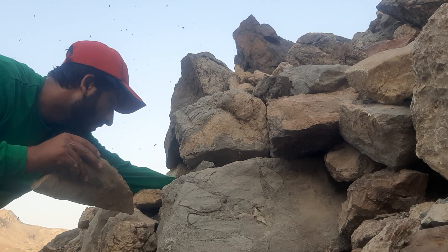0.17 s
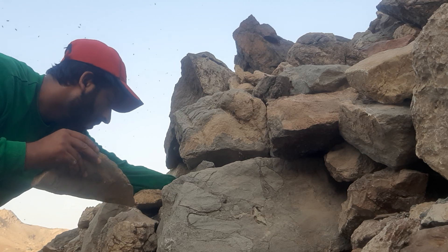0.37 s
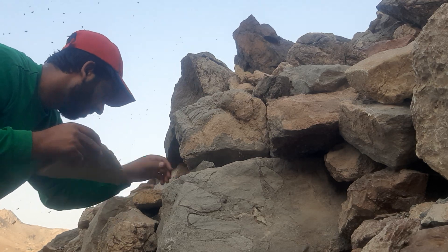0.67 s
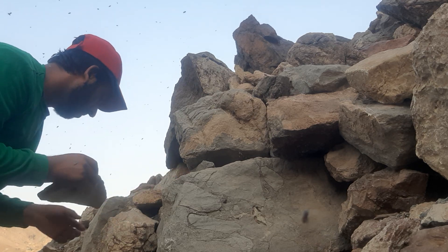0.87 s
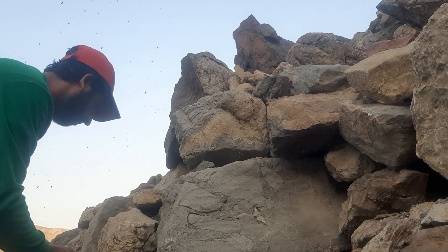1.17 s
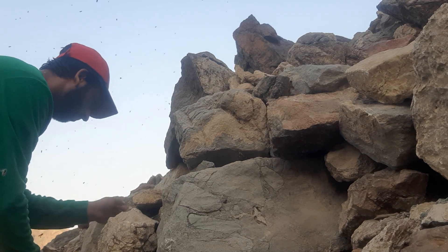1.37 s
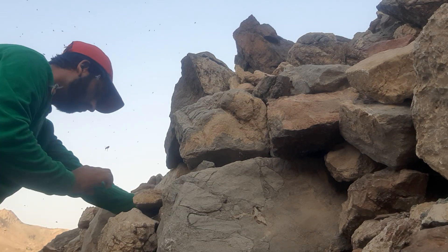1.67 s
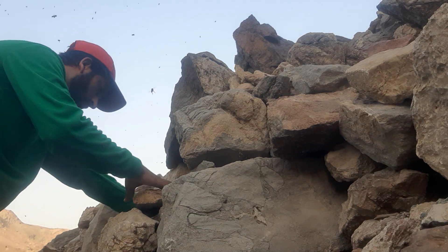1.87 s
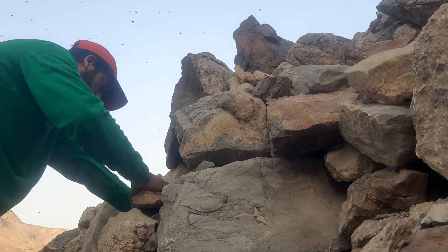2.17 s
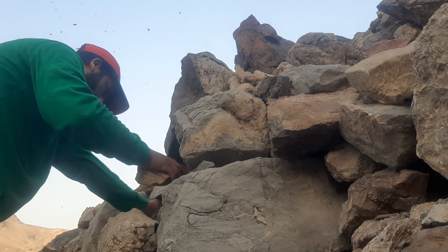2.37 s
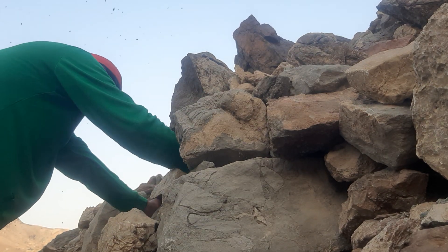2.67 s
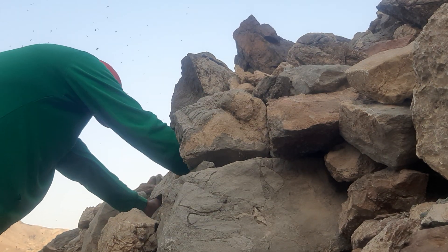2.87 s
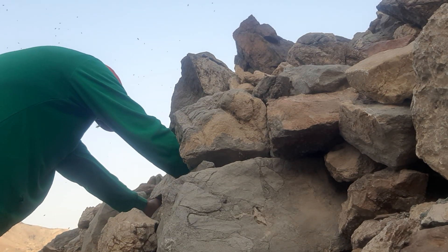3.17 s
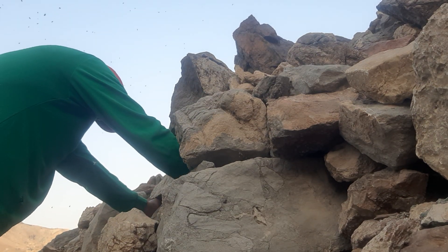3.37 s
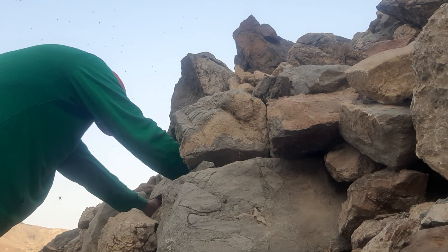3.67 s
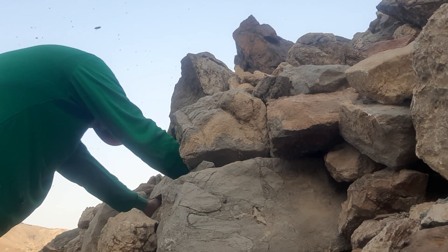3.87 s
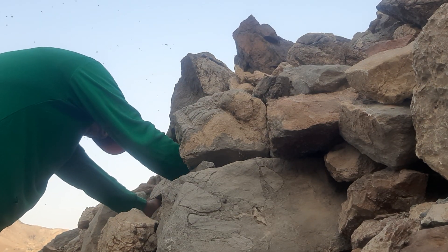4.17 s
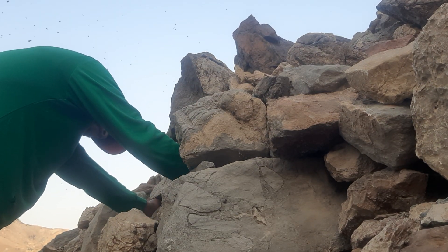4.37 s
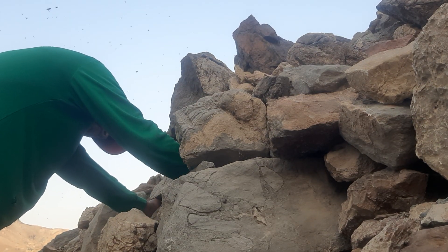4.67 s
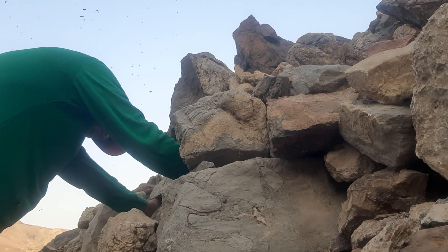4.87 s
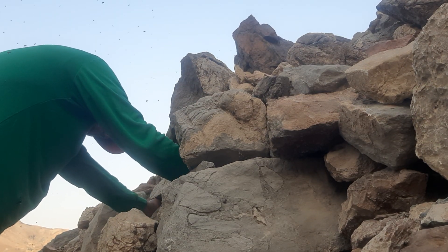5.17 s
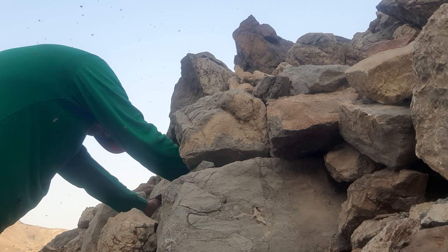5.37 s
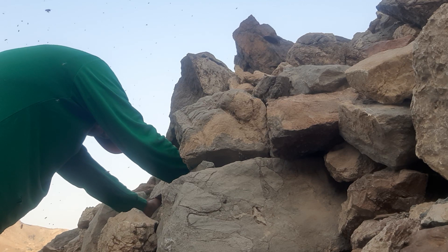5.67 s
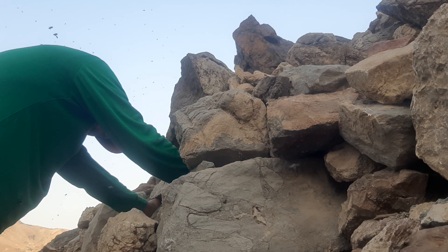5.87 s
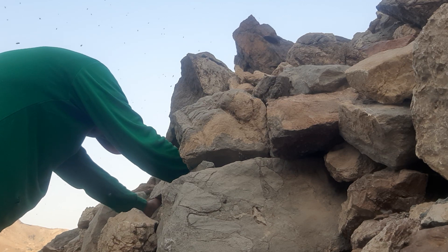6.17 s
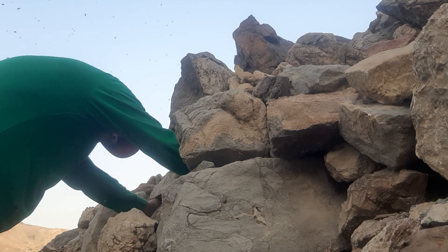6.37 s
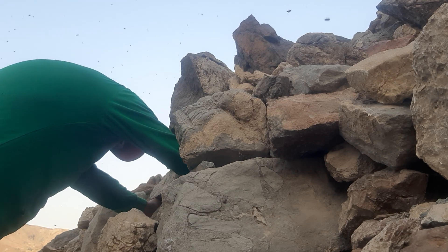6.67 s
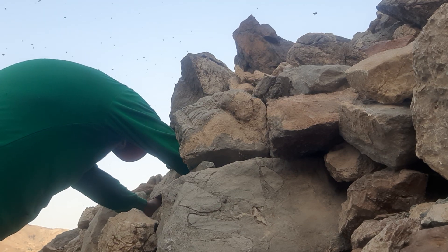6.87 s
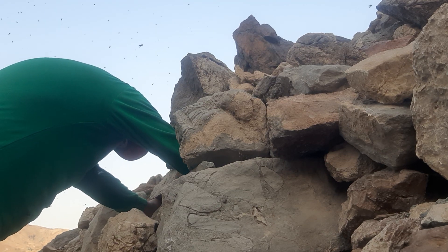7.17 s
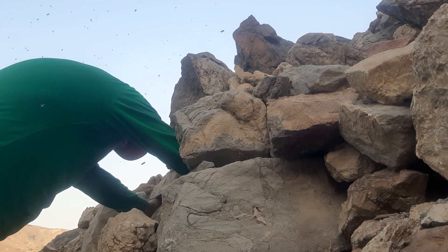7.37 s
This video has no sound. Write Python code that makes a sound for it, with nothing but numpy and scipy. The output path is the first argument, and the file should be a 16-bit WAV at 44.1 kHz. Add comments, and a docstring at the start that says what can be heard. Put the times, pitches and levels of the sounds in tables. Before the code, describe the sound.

Over faint bees and distant birds, a stone slab lands with two ringing clinks before hands shift rocks with dull knocks and bumps.

```python
"""A faint hum of bee wingbeats in open air comes first and runs throughout; birds call far away.
A flat stone is put down on a rock pile: its bending and twisting modes clink twice, bright and ringing,
as it rocks on sandy rock and settles. Dust slides off. Then hands shift stones deep in a gap:
dull knocks, booming hollows, bumps on soil, stick-slip rubbing and a little crushed grit."""
import sys
import numpy as np
from scipy import signal
from scipy.fft import rfft, irfft, next_fast_len
from scipy.io import wavfile
from scipy.ndimage import uniform_filter1d

SR = 44100
rng = np.random.default_rng(int(sys.argv[2]) if len(sys.argv) > 2 else 0)


def to_wav(s):
    """Save 16-bit WAV."""
    ch = np.atleast_2d(s).T  # columns
    pcm = np.round(np.clip(ch, -1, 1) * 32767)  # PCM
    wavfile.write(sys.argv[1], SR, pcm.astype(np.int16))


N = 332073
T = np.arange(N) / SR

# Table levels are relative; the functions add their own gains.
# swarm nearness: t/s, level/dB
SWARM_LEVELS = [(0, -71), (.7, -69), (1.2, -67), (2.2, -72.5), (3, -64.5), (5.6, -70.5), (7.53, -65)]
# wingbeat harmonics, from the first: level/dB
WING_HARMONICS_DB = [-3, 3.5, -13.5, -17, -12.5, -18.5]
# bird pip onsets: t/s
PIP_TIMES_S = [2.348, 2.634, 2.865, 3.084]
# falling bird whistles: t/s, start f/Hz, level/dB
BIRD_WHISTLES = [(1.37, 3970, -70.5), (2.98, 4070, -81), (4.72, 4000, -79), (5.33, 4740, -73),
                 (6.63, 3970, -76.5)]

# noise spectra: f/Hz, density level/dB
AIR_SPECTRUM = [(20, -17.5), (65, 1), (120, -2.5), (250, -9.5), (480, 0.5), (750, -5.5), (1000, -1.5),
                (1350, -10.5), (1550, -6.5), (1750, -21), (2050, -14.5), (2500, -23.5), (4500, -34.5)]
HISS_SPECTRUM = [(2000, -25), (3000, -13), (4500, -8.5), (5000, -3.5), (7200, -1.5), (7900, -8.5),
                 (8250, -26.5), (9700, -17.5), (10300, -7.5), (12500, -1), (15700, -1)]
DUST_SPECTRUM = [(1530, -34.5), (2600, -13.5), (3580, -1), (3950, -10.5), (4590, 6), (5530, -4), (7070, 7),
                 (8920, -15), (9680, -6.5), (15500, -10.5)]
GRIT_SPECTRUM = [(500, -10.5), (1500, 2.5), (2400, -2.5), (3200, -11), (4500, -2), (5600, 3.5),
                 (7500, -10.5), (8500, -35), (15000, -15)]
RUMBLE_SPECTRUM = [(30, -28), (44, 3.5), (75, 5), (120, -5), (200, -17), (400, -45)]
RUB_SPECTRUM = [(80, -31), (160, 1.5), (330, 3.5), (550, -7), (1000, -9.5), (1550, -19), (2000, -22),
                (5000, -32)]
BOOM_SPECTRUM = [(50, -23), (115, -4.5), (158, 8.5), (215, -2), (265, 4.5), (330, -1.5), (450, -5),
                 (700, -19.5), (1100, -24.5), (2000, -33), (4000, -55)]
SAND_SPECTRUM = [(900, -7.5), (1500, -3), (1950, 2.5), (2250, 2), (2800, -12), (3600, -3), (4500, -14.5),
                 (7000, -31.5)]

# grit crushed between stones: t/s, level/dB, Gaussian width/s
GRIT_BURSTS = [(4.953, -60.5, 0.0041), (4.968, -62.5, 0.0086), (5.048, -66, 0.035), (5.064, -56, 0.0035),
               (5.813, -72, .007)]
# pull of the hands, as rumble level: t/s, level/dB
PULL_EFFORT = [(2.25, -94), (2.35, -66.5), (2.78, -66), (2.93, -52.5), (3.07, -57), (3.46, -51),
               (3.51, -67), (3.62, -54.5), (4.13, -67.5), (4.16, -51.5), (4.69, -77), (5.1, -54.5),
               (5.19, -70), (5.32, -53), (5.6, -88), (5.85, -65), (6.31, -81), (7.53, -75.5)]
# heavy stones on soil: t/s, level/dB, f/Hz
SOIL_BUMPS = [(2.919, -44, 71), (3.319, -40, 75.6), (4.153, -37.5, 60), (4.191, -32.5, 74.2),
              (4.333, -38.5, 64), (4.961, -45, 119), (5.069, -36.5, 87), (5.305, -49, 82.2)]
# thin high rings: t/s, level/dB
THIN_RINGS = [(2.81, -61.5), (2.864, -69), (3.302, -65.5), (3.6, -72.5), (4.238, -58), (4.927, -67.5),
              (5.78, -71)]
# contacts inside the pile: t/s, level/dB, hardness as low-pass f/Hz
PILE_KNOCKS = [(2.037, -53, 990), (2.363, -52, 796), (2.58, -53.5, 900), (2.811, -30.5, 1720),
               (2.8629, -41, 1800), (3.052, -35, 840), (3.407, -50.5, 550), (3.7614, -36.5, 528),
               (3.8617, -33, 483), (3.941, -42, 347), (4.238, -46.5, 1900), (4.273, -40.5, 1200),
               (4.307, -47, 352), (4.4708, -38.5, 797), (4.718, -55, 325), (4.929, -47, 700),
               (4.9525, -29.5, 840), (5.021, -40, 376), (5.237, -46.5, 366), (5.782, -32.5, 271),
               (5.84, -51, 346), (6.694, -39, 540), (6.923, -34.5, 1100), (7.132, -48, 450),
               (7.19, -44.5, 408)]
# modes of the wedged stones: f/Hz, level/dB, t60/s
PILE_MODES = [(156, -15, 0.019), (268.4, -9.5, 0.051), (325, -16.5, 0.048), (423, -5, 0.027),
              (668, -15.5, 0.023), (735, -20, 0.12), (946, -10, 0.029), (1103, -16, 0.034),
              (1550, -18.5, 0.017), (2067, -19.5, 0.097)]

# modes of the rock under the slab: f/Hz, level/dB, t60/s
BEDROCK_MODES = [(113.3, -13.5, .2), (142.8, -16, .17), (245, -19.5, .09), (292, -13, 0.057),
                 (440, -15.5, 0.039), (665, 1.5, 0.036), (710, 10, 0.016), (968, -6.5, 0.067),
                 (1135, -9.5, 0.033), (1582, -4, .03), (2130, -8, 0.014), (2400, -9, .014),
                 (3180, -14, 0.021), (4376, -14, 0.017)]
# modes of the free slab: f/Hz, level/dB, t60/s, left over right/dB, right lag/rad
SLAB_MODES = [(2217, 0, .43, 8, 2.65), (3594, 0, .17, 10, -1.7), (5570, 0, .13, 6, -.35),
              (6350, -3, .08, 12, -.4), (7185, -9, .13, 11, 1), (4434, -19, .12, 6, .5),
              (10020, -21, .05, 6, 1), (10775, -18, .11, 6, -2), (11720, -22, .05, 6, 0),
              (12080, -22, .12, 6, -1), (12440, -18, .11, 6, 1)]
# slab landing and rocking: t/s, clack/dB, bending/dB, twisting/dB, overtones/dB, contact damping/(dB/s)
SLAB_TOUCHES = [(1.4723, -23, -3, -17.5, -43.5, 29), (1.4885, -23, -6.5, -24.5, -51, 5),
                (1.5221, -32.5, -12, -45, -56, 9), (1.5636, -27, -33.5, -39.5, -51, 18),
                (1.5801, -17.5, -2, -21, -30.5, 132), (1.6327, -33, -17.5, -45.5, -50, 118),
                (1.6548, -30, -22.5, -44, -44, 104), (1.684, -43.5, -45, -48, -66, 544.5),
                (1.71, -52, -63, -64, -81, 46.5)]


def from_db(db):
    return 10 ** (np.asarray(db) / 20)


def unit_rms(x):
    return x / np.sqrt(np.mean(x ** 2) + 1e-20)


def curve(rows):
    """Linear path through (t/s, value) rows."""
    return np.interp(T, *np.transpose(rows))


def drift(rate_hz):
    """Smooth random signal, rms 1."""
    knot_hz = 400
    knots = rng.standard_normal(int(N / SR * knot_hz) + 1)
    slow = uniform_filter1d(knots, max(1, int(knot_hz / rate_hz)))
    slow = uniform_filter1d(slow, max(1, int(knot_hz / 2 / rate_hz)))
    return np.interp(T, np.arange(len(slow)) / knot_hz, unit_rms(slow))


def swell(start_s, rise_s, t60_s):
    """Envelope: rise, then exponential decay."""
    age_s = np.clip(T - start_s, 0, 2 * t60_s)
    return (1 - np.exp(-age_s / rise_s)) * np.exp(-np.log(1000) * age_s / t60_s)


def gaussian(centre_s, width_s):
    return np.exp(-.5 * ((T - centre_s) / width_s) ** 2)


def arch(start_s, length_s):
    return np.sin(np.pi * np.clip((T - start_s) / length_s, 0, 1))


def lowpass(x, hz):
    return signal.sosfilt(signal.butter(2, np.clip(hz, 20, SR / 3), fs=SR, output="sos"), x)


def coloured(x, spectrum):
    """Apply a spectrum, rolled off beyond both ends."""
    size = next_fast_len(N)
    hz = np.maximum(np.arange(size // 2 + 1) * SR / size, 1)
    points_hz, level_db = np.transpose(spectrum)
    gain = from_db(np.interp(np.log(hz), np.log(points_hz), level_db))
    gain *= np.minimum(hz / points_hz[0], 1) ** 2 * np.minimum(points_hz[-1] / hz, 1) ** 2
    return irfft(rfft(x, size) * gain, size)[..., :N]


def place(x, pan_db, lead_ms):
    """Mono to stereo; positive values make the left louder and earlier."""
    delayed = np.interp(T - lead_ms / 1000, T, x)
    return np.array([x * from_db(pan_db / 2), delayed * from_db(-pan_db / 2)])


def noise(spectrum, coherence, pan_db, lead_ms=0):
    """Stereo noise, direct plus diffuse; rms about 1."""
    direct, left, right = unit_rms(coloured(rng.standard_normal((3, N)), spectrum))
    diffuse = np.array([left, right]) * from_db([[pan_db / 2], [-pan_db / 2]])
    return np.sqrt(coherence) * place(direct, pan_db, lead_ms) + np.sqrt(1 - coherence) * diffuse


def blurred_tone(hz, blur_hz):
    """Tone of wavering amplitude and phase, rms 1."""
    phase = 2 * np.pi * np.cumsum(hz * np.ones(N)) / SR
    return drift(blur_hz) * np.sin(phase) + drift(blur_hz) * np.cos(phase)


def mix_in(out, start_s, sound):
    at = int(round(start_s * SR))
    out[at:at + len(sound)] += sound[:N - at]


def impact(modes, crunch_s, spread_db, detune, crunch=.04):
    """A click and short crunch ring the modes, varied per contact; rms 1 over the first 20 ms."""
    t = T[:SR // 3]
    force = crunch * rng.standard_normal(len(t)) * np.exp(-t / crunch_s)
    force[0] += 1
    out = 0
    for k, (hz, db, t60_s) in enumerate(modes):
        louder, higher = rng.standard_normal(2)
        radius = from_db(-60 / (t60_s * SR))
        angle = 2 * np.pi * hz * (1 + detune * higher) / SR
        ring = signal.lfilter([0, np.sin(angle)], [1, -2 * radius * np.cos(angle), radius ** 2],
                              force + 1e-18)
        out += (-1) ** k * from_db(db + spread_db * louder) * ring   # adjacent modes in antiphase
    return out / np.std(out[:SR // 50])


def bees(count=12):
    """Each bee's wingbeat wavers as it turns, nears and leaves."""
    out = np.zeros((2, N))
    for wingbeat_hz in np.linspace(164, 200, count):
        hz = wingbeat_hz * (1 + .035 * drift(4) + .015 * drift(40))
        phase = 2 * np.pi * np.cumsum(hz) / SR
        buzz = sum(from_db(db) * np.sin(k * phase) for k, db in enumerate(WING_HARMONICS_DB, 1))
        buzz *= from_db(3.5 * drift(2.5))
        out += place(buzz, pan_db=rng.normal(8, 2), lead_ms=rng.normal(.44, .08))
    return from_db(curve(SWARM_LEVELS)) * unit_rms(out)


def background(air_db=-70, hiss_db=-71.5, dip_db=-5.5):
    """Bees, open air and fine hiss; all dip briefly after the clinks."""
    air = from_db(air_db + 1.4 * drift(5.8)) * noise(AIR_SPECTRUM, coherence=.48, pan_db=8, lead_ms=.4)
    hiss = from_db(hiss_db) * noise(HISS_SPECTRUM, coherence=.032, pan_db=8.5)
    start_s, fall_s, end_s, return_s = 1.96, .17, 2.83, .11
    dip = np.clip(np.minimum((T - start_s) / fall_s, (end_s - T) / return_s), 0, 1)
    return from_db(dip_db * dip) * (bees() + air + hiss)


def birds(gain_db=-4, pip_db=-68.5, pip_hz=2288, pip_s=.062, whistle_s=.125, fall_hz_per_s=2300):
    """One bird pips on one note, another gives falling whistles; distance blurs both."""
    pips = from_db(pip_db) * sum(arch(s, pip_s) for s in PIP_TIMES_S) * blurred_tone(pip_hz, blur_hz=90)
    envelope, hz = np.zeros(N), np.zeros(N)
    for s, start_hz, db in BIRD_WHISTLES:
        envelope += from_db(db) * arch(s, whistle_s)
        hz = np.where(T >= s, start_hz - fall_hz_per_s * np.minimum(T - s, whistle_s), hz)
    whistles = envelope * blurred_tone(hz, blur_hz=130)
    return from_db(gain_db) * place(pips + whistles, pan_db=8.5, lead_ms=.15)


def dust(gain_db=-62):
    """Dust slides off in one swish once the slab has settled."""
    swish = noise(DUST_SPECTRUM, coherence=.17, pan_db=3)
    rub = from_db(-3.5) * noise(RUB_SPECTRUM, coherence=.82, pan_db=5.5)
    return from_db(gain_db) * gaussian(centre_s=1.897, width_s=.068) * (swish + rub)


def grit(grains_per_s=1500, size_db=4):
    """Sand grains crack in short bursts."""
    bursts = sum(from_db(db) * gaussian(s, width_s) for s, db, width_s in GRIT_BURSTS)
    sizes = from_db(size_db * np.minimum(rng.exponential(1, N), 3)) * rng.choice([-1, 1], N)
    cracks = sizes * (rng.random(N) < grains_per_s / SR)
    return place(bursts * unit_rms(coloured(cracks, GRIT_SPECTRUM)), pan_db=9.5, lead_ms=.047)


def dragging(rumble_gain_db=-3, firm_pull_db=-53.5, firm_rub_db=-65, rub_db_per_db=.56, judder_db=3):
    """Pulled stones stick and slip: lumpy rumble and rubbing, both growing with effort."""
    effort_db = curve(PULL_EFFORT)
    rumble = from_db(effort_db + rumble_gain_db + 3.7 * drift(25))
    rumble = rumble * noise(RUMBLE_SPECTRUM, coherence=.33, pan_db=-12.5)
    rub_db = firm_rub_db + rub_db_per_db * (effort_db - firm_pull_db) + judder_db * drift(60)
    rub = from_db(rub_db) * noise(RUB_SPECTRUM, coherence=.64, pan_db=7, lead_ms=.18)
    return (T > PULL_EFFORT[0][0]) * (rumble + rub)


def soil_bumps(rise_s=.00067, t60_s=.052):
    """Heavy stones sink against soil: a few slow swings each."""
    out = sum(from_db(db) * swell(s, rise_s, t60_s) * np.sin(2 * np.pi * hz * (s - T))
              for s, db, hz in SOIL_BUMPS)
    return place(out, pan_db=-9, lead_ms=.2)


def thin_rings(gain_db=-3, ring_hz=6630):
    """Some contacts set off a faint high ring, as of a loose stone chip."""
    envelope = sum(from_db(db) * swell(s, rise_s=.0074, t60_s=.19) for s, db in THIN_RINGS)
    return from_db(gain_db) * place(envelope * blurred_tone(ring_hz, blur_hz=130), pan_db=15, lead_ms=.1)


def pile_knocks(gain_db=-11, muffle_hz=2100):
    """Wedged stones knock dully; the hollows boom on, less so after hard contacts."""
    ref_boom_db, ref_knock_db, boom_db_per_db = -47.5, -38.5, .66
    blunt_hz, loss_db_per_octave = 605, 2.5
    knocks, boom_power = np.zeros(N), np.zeros(N)
    for s, db, hardness_hz in PILE_KNOCKS:
        knock = impact(PILE_MODES, crunch_s=.007, spread_db=1.5, detune=.04)
        mix_in(knocks, s, from_db(db) * lowpass(knock, hardness_hz))
        boom_db = ref_boom_db + boom_db_per_db * (db - ref_knock_db)
        boom_db -= loss_db_per_octave * max(np.log2(hardness_hz / blunt_hz), 0)
        boom_power += (from_db(boom_db) * swell(s, rise_s=.0058, t60_s=.28)) ** 2
    hollows = np.sqrt(boom_power) * noise(BOOM_SPECTRUM, coherence=.77, pan_db=4, lead_ms=.081)
    return from_db(gain_db) * place(lowpass(knocks, muffle_hz), pan_db=5, lead_ms=.15) + hollows


def slab_grinding(gain_db=-21, grain_db=3):
    """Between touches the slab rolls on sand, which roughens its ring."""
    power = sum((from_db(db) * swell(s, rise_s=.002, t60_s=.22)) ** 2 for s, db, *_ in SLAB_TOUCHES)
    envelope = from_db(gain_db + grain_db * drift(300)) * np.sqrt(power)
    return envelope * noise(SAND_SPECTRUM, coherence=.97, pan_db=3.5, lead_ms=.15)


def slab_clacks(clack_gain_db=-9, thud_gain_db=-22, hardness_hz=3400, low_cut_hz=105):
    """The rock beneath clacks and thuds at each touch, with little deep bass."""
    clacks, thud_power = np.zeros(N), np.zeros(N)
    for s, db, *_ in SLAB_TOUCHES:
        mix_in(clacks, s, from_db(db) * impact(BEDROCK_MODES, crunch_s=.005, spread_db=1, detune=.008))
        thud_power += (from_db(db) * swell(s, rise_s=.0026, t60_s=.45)) ** 2
    clacks = place(lowpass(clacks, hardness_hz), pan_db=7, lead_ms=.046)
    thuds = np.sqrt(thud_power) * noise(BOOM_SPECTRUM, coherence=.85, pan_db=-.5, lead_ms=.076)
    out = from_db(clack_gain_db) * clacks + from_db(thud_gain_db) * thuds
    return signal.sosfilt(signal.butter(2, low_cut_hz, "high", fs=SR, output="sos"), out)


def slab_ring(smoothing_hz=700, chatter_s=.018, echo_db=(-48, -63), echo_t60_s=1.4):
    """Each touch resets how strongly the slab rings and how fast the rock beneath drains it."""
    touches = np.array(SLAB_TOUCHES)
    landing_s = touches[0, 0]
    latest = np.maximum(np.searchsorted(touches[:, 0], T, side="right") - 1, 0)
    touch_s, _, bend_db, twist_db, overtone_db, damping_db_per_s = touches[latest].T
    age_s = np.maximum(T - touch_s, 0)
    # rough faces chatter after each touch, unsettling phase and amplitude
    chatter = lowpass(.28 * np.exp(-age_s / chatter_s) + 1e-18, hz=300)
    out = np.zeros((2, N))
    for k, (hz, db, t60_s, pan_db, lag_rad) in enumerate(SLAB_MODES):
        strike_db = (bend_db, twist_db, overtone_db)[min(k, 2)]
        level_db = db + strike_db - age_s * (60 / t60_s + damping_db_per_s)
        envelope = from_db(np.maximum(level_db, -200)) * (T >= landing_s)
        envelope = lowpass(envelope + 1e-18, smoothing_hz)
        phase = 2 * np.pi * hz * (T - landing_s)
        rough_phase = phase + chatter * drift(400)
        tone = np.array([np.sin(rough_phase), from_db(-pan_db) * np.sin(rough_phase - lag_rad)])
        out += envelope * (1 + chatter * drift(400)) * tone
        if k < 2:   # the rocky slope scatters the two strong tones back
            scatter = np.array([from_db(3 * drift(30)) * np.sin(phase + drift(25)) for _ in range(2)])
            out += from_db(echo_db[k]) * swell(landing_s, rise_s=.03, t60_s=echo_t60_s) * scatter
    return out


def scene():
    slab = slab_ring() + slab_clacks() + slab_grinding()
    pile = pile_knocks() + thin_rings() + soil_bumps() + dragging() + grit() + dust()
    return slab + pile + birds() + background()


def record(dry):
    """Steep treble cut."""
    cutoff_hz = 15800
    return signal.sosfilt(signal.ellip(12, .1, 80, cutoff_hz, fs=SR, output="sos"), dry)


dry = scene()
out = record(dry)
to_wav(out)
```